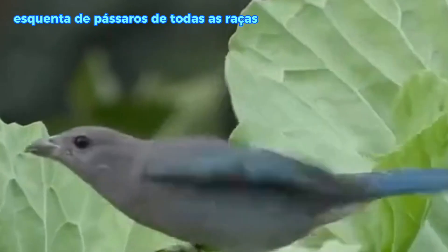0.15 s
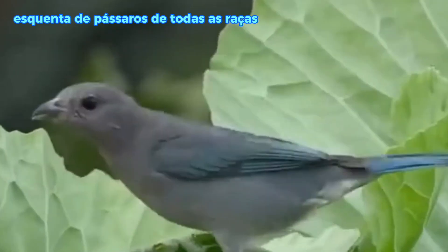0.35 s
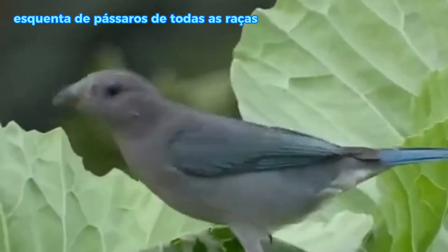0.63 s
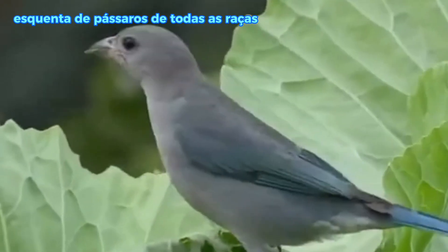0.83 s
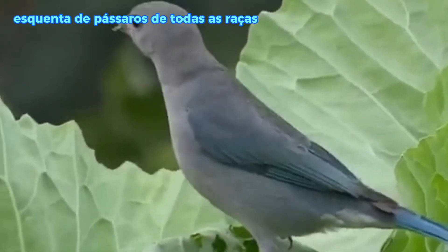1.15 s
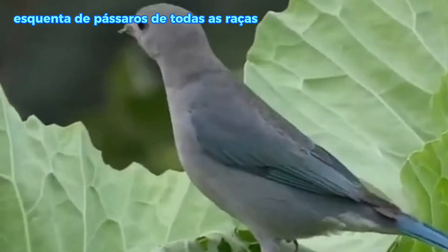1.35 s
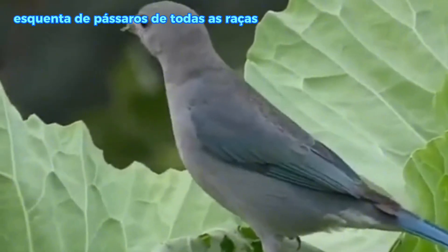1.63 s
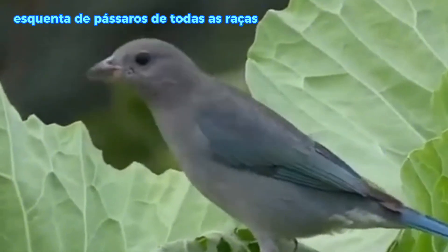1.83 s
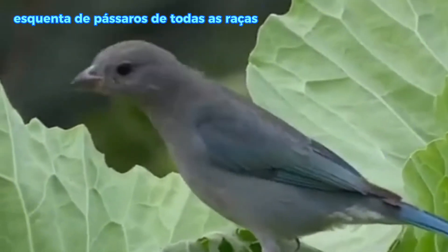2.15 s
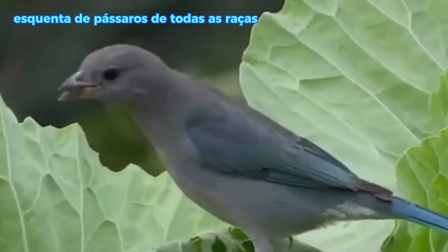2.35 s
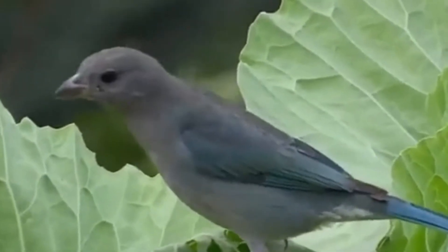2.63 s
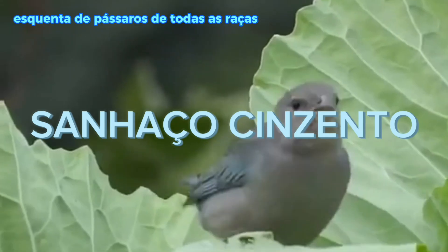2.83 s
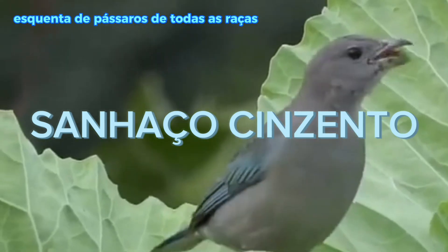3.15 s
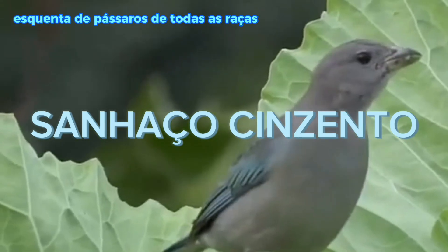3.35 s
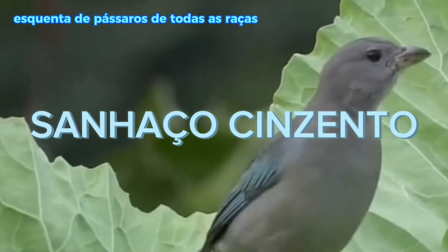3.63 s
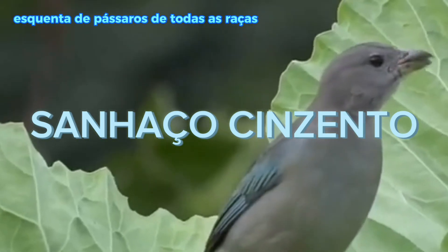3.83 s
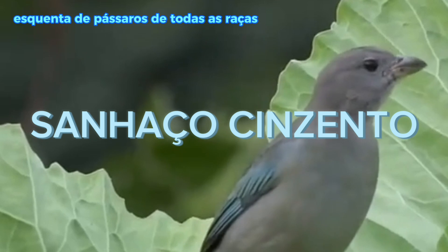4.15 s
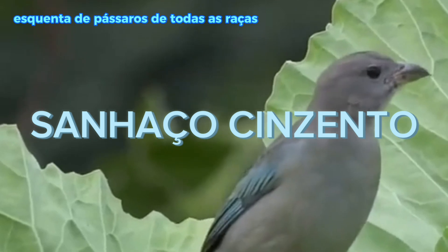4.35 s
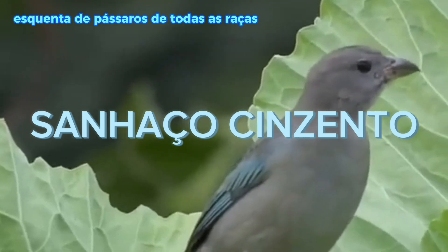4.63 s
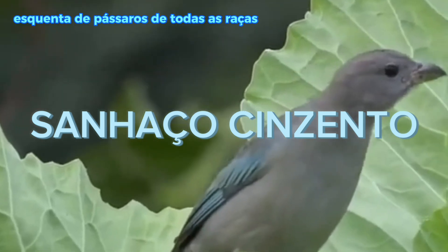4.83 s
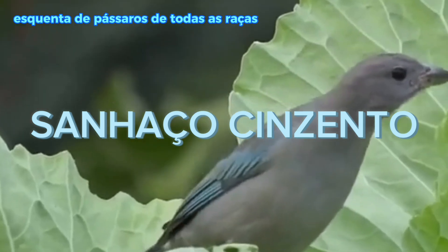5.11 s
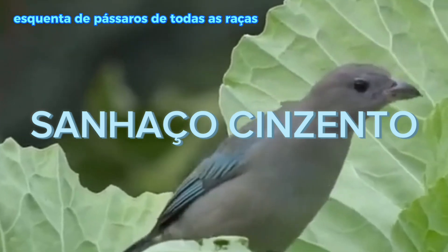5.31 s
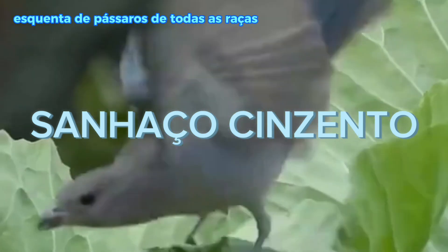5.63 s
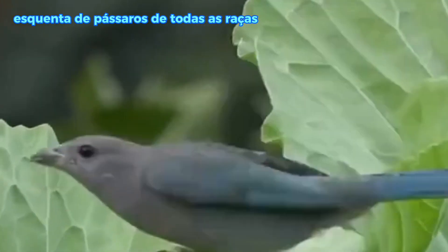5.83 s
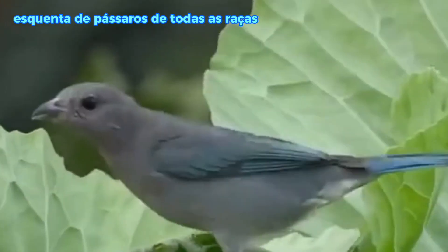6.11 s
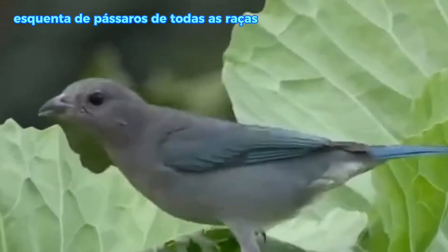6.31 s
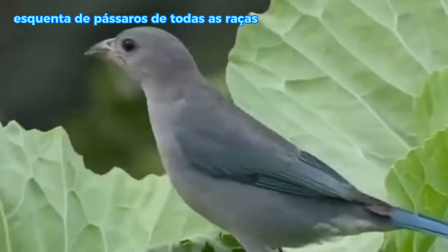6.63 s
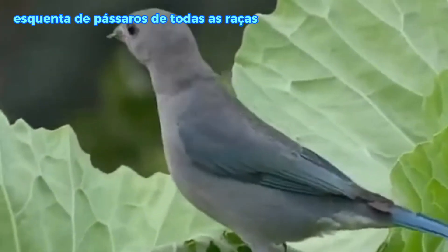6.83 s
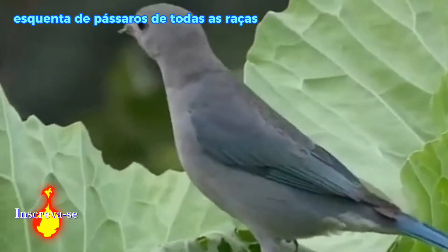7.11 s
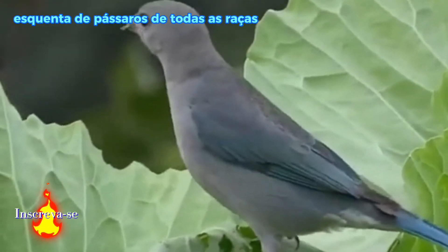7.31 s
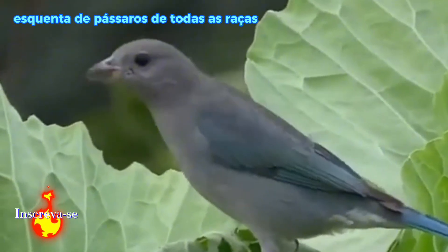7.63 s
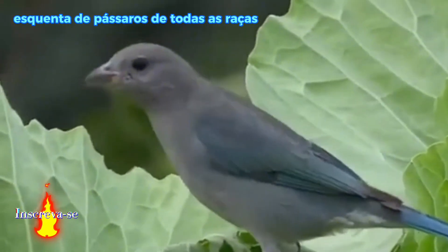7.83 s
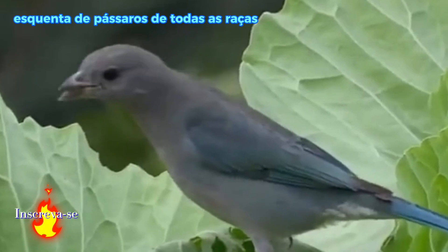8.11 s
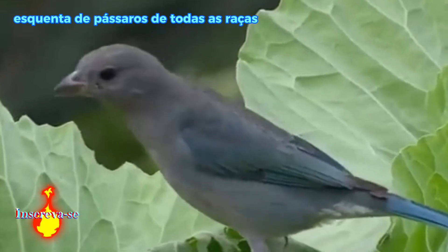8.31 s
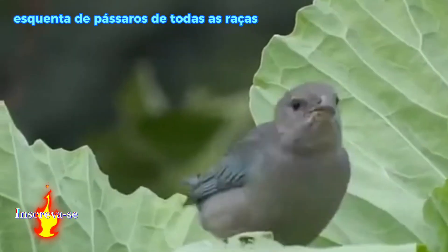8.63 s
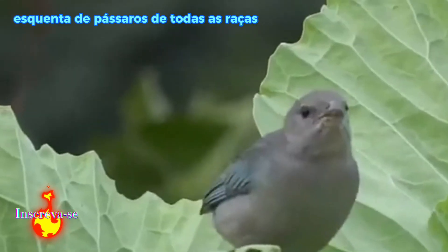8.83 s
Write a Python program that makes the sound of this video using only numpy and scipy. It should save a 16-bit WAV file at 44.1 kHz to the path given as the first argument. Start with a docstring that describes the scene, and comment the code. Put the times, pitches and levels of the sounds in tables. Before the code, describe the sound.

A sayaca tanager sings two squeaky, sliding phrases and a pure whistle between sharp falling chips, over low outdoor rumble and soft distant hoots.

```python
"""A tanager gives sharp falling chips, two phrases of squeaky song and a long whistle near a garden feeder.
Its notes are gliding tones with overtones and rasp from the two-sided voice box (syrinx).
Nearby walls, made of delayed copies and fading noise, throw the notes back so that they beat and smear.
Behind it: shaped noise for the rumble and hiss of outdoors, a faint hum that comes and goes,
soft distant hoots, and a few dull bumps and a light rustle at the microphone. Once the sound cuts out."""
import sys
import numpy as np
from scipy import signal
from scipy.fft import rfft, irfft, next_fast_len
from scipy.io import wavfile
from scipy.ndimage import uniform_filter1d, map_coordinates

SR = 44100
rng = np.random.default_rng(int(sys.argv[2]) if len(sys.argv) > 2 else 0)


def waveform_to_disk(signal):
    """Save audio, clipped to [-1, 1], as 16-bit WAV at the path in sys.argv[1]."""
    frames = np.transpose(np.atleast_2d(signal))
    scaled = np.clip(frames, -1, 1) * 32767
    samples = np.round(scaled).astype(np.int16)
    wavfile.write(sys.argv[1], SR, samples)


N = 395136
TIME = np.arange(N) / SR
TOP_HZ = 15850  # no sound is kept above this pitch


def amp(db):
    """Turn decibels into a plain multiplier."""
    return 10 ** (np.asarray(db) / 20)


def unit(x):
    """Scale a sound to an average (RMS) strength of 1."""
    return x / np.sqrt(np.mean(x ** 2) + 1e-20)


def along(points, hz):
    """Read a (frequency [Hz], value) table at hz, joining its points on a log frequency axis."""
    f, v = np.transpose(points)
    return np.interp(np.log(hz + 1), np.log(f + 1), v)


def curves(rows, t=TIME):
    """Read each column after the time column at times t."""
    s, *columns = np.transpose(rows)
    return [np.interp(t, s, column) for column in columns]


def wobble(rate, size):
    """A smooth random curve through `rate` random points a second."""
    knots = rng.standard_normal(int(size * rate / SR) + 4)
    return map_coordinates(knots, [np.arange(size) * rate / SR])


def filtered(x, response):
    """Scale every frequency of a sound by response(frequency)."""
    m = next_fast_len(len(x) + 8192)
    return irfft(rfft(x, m) * response(np.fft.rfftfreq(m, 1 / SR)), m)[:len(x)]


def add(track, s, sound):
    """Mix a sound into the track at time s."""
    start = max(round(s * SR), 0)
    part = track[start:start + len(sound)]
    part += sound[:len(part)]


# tone balance of the outdoor noise: (frequency [Hz], relative level [dB per Hz])
AIR = [(12, -43), (20, -22.5), (70, 3.5), (126, -5.5), (213, -15), (315, -14), (491, -17), (649, -17),
       (1130, -21), (1870, -26), (3640, -32.5), (5230, -37), (15500, -49)]
# background before and after the dropout, before small lifts: (time [s], rumble level [dB], wash level [dB])
BACKGROUND = [
    [(0.0, -43, -49), (0.7, -48, -49), (0.83, -52, -49), (1.01, -51, -50), (1.14, -47, -50),
     (1.48, -47, -49), (1.6, -46, -49), (1.92, -49, -51), (2.37, -47, -52), (2.46, -49, -52),
     (2.55, -53, -52)],
    [(2.95, -53, -51), (3.17, -48, -50), (3.84, -49, -51), (4.66, -54, -54), (5.14, -50, -49),
     (5.64, -52, -54), (6.18, -46, -48), (7.42, -49, -50), (7.92, -40, -51), (8.44, -47, -50),
     (8.96, -46, -50)],
]
# the thin hiss: (time [s], level [dB])
HISS = [(0, -59), (1.1, -62), (3.1, -61.5), (5.6, -67), (6.5, -63), (8.05, -62), (8.96, -65.5)]
# the hum, before a 1 dB lift: (time [s], level [dB])
HUM = [(0, -70), (1, -59), (1.3, -42), (1.7, -42), (2.2, -68), (8.3, -73.5), (8.6, -45), (8.96, -49.5)]


def outdoors(rumble_hz=220, hiss_hz=1800, hum_hz=124):
    """Noise split into distant rumble, middle wash and thin hiss, each with its own level, plus a wavering hum."""
    def below(hz, edge):
        return 1 / np.sqrt(1 + (hz / edge) ** 8)

    def above(hz, edge):
        return np.sqrt(1 - below(hz, edge) ** 2)

    def band(shape):
        noise = rng.standard_normal(N)
        return unit(filtered(noise, lambda hz: amp(along(AIR, hz)) * shape(hz)))

    rumble_db, wash_db = curves(np.concatenate(BACKGROUND))
    rumble_db = rumble_db + 4.2 + 0.54 * wobble(7.8, N)
    wash_db = wash_db + 0.3 + 0.479 * wobble(12, N)
    rumble = amp(rumble_db) * band(lambda hz: below(hz, rumble_hz))
    wash = amp(wash_db) * band(lambda hz: above(hz, rumble_hz) * below(hz, hiss_hz))
    hiss = amp(curves(HISS)[0]) * band(lambda hz: above(hz, hiss_hz))
    hum_phase = 2 * np.pi * np.cumsum(hum_hz + 1.2 * wobble(2, N)) / SR
    hum = amp(curves(HUM)[0] + 1) * np.sin(hum_phase)
    return rumble + wash + hiss + hum


# tone balance of the bird's rasp: (frequency [Hz], relative level [dB per Hz])
RASP = [(1200, -18.5), (1850, -8.5), (2500, -3), (4000, -1.5), (6000, 0.5), (8200, 1), (10500, -2.5),
        (15500, -17.5)]


def syrinx(hz, level_db, octave_db, rough, jitter=.06, flutter_db=7, rough_rate=420, third_db=-2, fall_db=-6,
           cap_db=-17, blur=1.0, rasp_db=-24, loose_hz=4200, fast_glide=11):
    """A gliding whistle with overtones; roughness shakes its pitch and strength and adds a rasp."""
    size = len(hz)
    # the membranes vibrate cleanly on high held notes, loosely on low notes and in fast glides
    glide = np.minimum(np.abs(np.gradient(np.log(hz))) * SR / fast_glide, 1) ** 2
    low_note = 1 / (1 + (hz / loose_hz) ** 12)
    loose = np.maximum(uniform_filter1d(glide, 400), low_note)
    rough = np.abs(rough) + .13 * glide
    hz = hz * (1 + jitter * rough * wobble(rough_rate, size))
    phase = 2 * np.pi * np.cumsum(hz) / SR

    def smear():
        return 2 * blur * np.sqrt(np.abs(rough)) * wobble(1300, size)

    octave_phase = 2 * phase + smear() * np.clip(hz / loose_hz - .8, 0, 1)
    tone = amp(level_db) * np.sin(phase)
    tone += amp(octave_db) * np.sin(octave_phase) * (2 * hz < TOP_HZ)
    # the higher overtones are weaker and lose their phase sooner
    loudest_db = np.maximum(level_db, octave_db)
    upper_db = np.minimum(octave_db + third_db, loudest_db + cap_db * (1 - rough))
    for k in range(3, 7):
        tone += amp(upper_db + fall_db * (k - 3)) * np.sin(k * phase + smear()) * (k * hz < TOP_HZ)
    # the rasp grows more slowly than the whistle
    noise = unit(filtered(rng.standard_normal(size), lambda f: amp(along(RASP, f))))
    rasp = 2 * amp(rasp_db + 0.4 * loudest_db) * (loose + 0.054) * np.abs(rough) ** 0.89 * noise
    edges = signal.windows.tukey(size, min(.007 * SR / size, 1))
    flutter = amp(flutter_db * rough * wobble(rough_rate, size))
    return (np.sqrt(2) * tone + rasp) * edges * flutter


# the octave is strongest where it meets the throat's resonance near 6 kHz:
# (pitch [Hz], octave over the basic tone [dB], before each note's own extra)
OCTAVE = [(2000, -4), (2400, -2), (2750, 5), (3050, 13), (3350, -3), (3700, -21), (5000, -18), (5800, -22),
          (6500, -38)]


def voice(hz, level_db, rough, extra_octave_db):
    """The syrinx heard through the throat, which favours the octave at some pitches."""
    return syrinx(hz, level_db, level_db + along(OCTAVE, hz) + extra_octave_db, rough)


# falling chips: (time [s], pitch the fall heads for [Hz], length [s], level [dB], overtone offset [dB],
# second voice offset [dB], treble boost [dB])
CHIPS = [ (0.381, 2500, .057, -43.5, -3, 1, 6), (1.188, 1950, .063, -40.5, -4.5, -1, 1),
         (1.422, 2300, .069, -38.5, -5.5, -12, 1.5), (2.937, 1900, .059, -38, -5, 2, -40),
         (3.242, 1780, .06, -39, 0, -2, 4), (3.398, 2260, .062, -38, 0.5, -7.5, 3),
         (6.163, 1850, .048, -35.5, 1, 0, 2.5), (7.994, 2500, .03, -63, -8, -8, -14),
         (8.735, 1900, .06, -41.2, -3.5, -1, 4), ]


def chips(start_hz=6200, lag=0.02, second_length=.026, onset_db=-8, lead_hz=7200, lead_db=-25, treble_hz=7000):
    """A thin high lead-in, then a plunge that swells and frays; the syrinx's other side follows a moment later."""
    glide_s, echo_db = .018, -3  # time constant of the plunge; strength of its wall echo
    lead_s = .022
    for s, end_hz, length, db, overtone_db, second_db, treble_db in CHIPS:
        t = np.arange(int(length * SR)) / SR
        hz = end_hz + (start_hz - end_hz) * np.exp(-t / glide_s)
        effort = db + np.interp(t / length, [0, .25, .7, 1], [onset_db, -3, 0, -5])
        octave = effort + overtone_db + np.interp(t / length, [0, .55, 1], [-10, 2, -6])
        rough = np.interp(t / length, [0, .6, 1], [.03, .32, .38])

        def colour(x):
            return filtered(x, lambda f: amp(treble_db / (1 + (treble_hz / (f + 1)) ** 30)))

        lead_in = syrinx(np.full(int(lead_s * SR), lead_hz), db + lead_db, db + lead_db - 12, .15)
        yield s - lead_s, lead_in, echo_db
        yield s, colour(syrinx(hz, effort, octave, rough)), echo_db
        early = t < second_length
        second = voice(hz[early], db + second_db, rough[early], -8)
        yield s + lag, colour(second), echo_db


# how long the later echoes take to fade by 60 dB: (frequency [Hz], fade time [s])
GARDEN = [(2000, 0.71), (5000, 0.43), (9000, 0.25), (15000, 0.25)]


def walls(x, early_t60=0.26, late_db=-5, first_s=0.0053):
    """Echoes made of fading noise: dense early reflections and a longer tail whose treble dies first."""
    hz, t, z = signal.stft(rng.standard_normal(SR // 2), SR, nperseg=256)
    early = amp(-60 * t / early_t60)
    late = amp(late_db - 60 * t / along(GARDEN, hz)[:, None])
    tail = signal.istft(z * (early + late), SR, nperseg=256)[1]
    # silent until first_s, then rising to full by twice that time
    tail *= np.clip(np.arange(len(tail)) / (first_s * SR) - 1, 0, 1)
    return signal.fftconvolve(x, tail / np.linalg.norm(tail))


# tone balance of the notes: (frequency [Hz], boost [dB])
NOTE_TONE = [(2000, 1), (7500, 0), (8500, 5), (9600, -5), (11300, 5), (13000, -4), (14700, 11), (15800, 1)]
# the nearest walls: (delay [s], level [dB])
REFLECTIONS = [(.021, -8), (.043, -27)]


def tanager(beam_hz=7500, diffuse_db=-1, shade_db=-1.5):
    """Notes arrive directly and off walls; a bird that faces away sends more, and its treble, to the walls."""
    track = np.zeros(N)
    for s, note, echo_db in [*syllables(), held_whistle(), *chips()]:
        note = filtered(note, lambda hz: amp(along(NOTE_TONE, hz)))
        away = amp(echo_db)
        treble = filtered(note, lambda hz: 1 / (1 + (beam_hz / (hz + 1)) ** 8))
        direct = note - np.minimum(away, .8) * treble
        direct = direct * amp(shade_db * np.minimum(away, 1) ** 3)
        # no tail outlasts the dropout
        heard = track[:int(DROPOUT[2][0] * SR)] if s < DROPOUT[0][0] else track
        add(heard, s, direct)
        add(heard, s, amp(diffuse_db) * walls(note * away))
        for delay, db in REFLECTIONS:
            add(heard, s + delay, amp(db) * note * away)
    return track


# two phrases in the same order, the second carried on to its ending:
# (time [s], syllable name, length [s], level [dB], wall echo [dB])
SONG = [ (1.540, "peep", .022, -36, -3), (1.559, "snap", .012, -42, -3), (1.594, "chirp", .038, -33.5, -3),
        (1.675, "sizzle", .03, -29, -3), (1.677, "dive", .025, -22, -3), (1.694, "swoop", .066, -25.5, -4),
        (1.730, "undertone", .027, -37.5, -5), (1.815, "upsweep", .062, -21.5, -3),
        (1.932, "hook", .029, -34.5, -3), (1.966, "slur", .050, -27, -3), (2.015, "snap", .014, -36, -1),
        (2.096, "arch", .300, -16.8, -4.5), (2.488, "twang", .062, -31.5, -3),
        (2.552, "flick", .028, -31, -2), (2.556, "sizzle", .02, -26, -2), (2.628, "rise", .200, -21, -3.5),
        (3.515, "peep", .020, -36, -4.5), (3.534, "snap", .014, -37, -4.5),
        (3.566, "chirp", .040, -31, -4.5), (3.652, "sizzle", .03, -26, -6),
        (3.655, "dive", .027, -18.5, -6), (3.675, "swoop", .060, -21, -6.5),
        (3.702, "undertone", .031, -34, -6), (3.797, "upsweep", .057, -19, -6),
        (3.906, "hook", .030, -34.5, -3), (3.939, "slur", .047, -26.5, -3), (3.985, "snap", .013, -30, -3),
        (4.066, "arch", .296, -13.2, -6.5), (4.452, "twang", .058, -30.5, -5),
        (4.511, "flick", .029, -31, -5), (4.597, "rise", .265, -14.5, -6), (4.964, "creak", .022, -43, -1),
        (4.986, "dip", .040, -29.5, -1), (5.026, "twang", .035, -30, -7), (5.060, "flick", .025, -28, -3),
        (5.141, "pip", .114, -14, -10), (5.168, "squeal", .148, -20.5, -3), (5.764, "creak", .021, -44, -7),
        (5.794, "droop", .186, -27.3, -7), ]
# each syllable's pitch at even steps from its start to its end: name: (pitch [Hz], ...)
PITCH_PATHS_HZ = { "peep": (3850, 4150, 4250), "snap": (4900, 3200, 2100),
                  "chirp": (3600, 2700, 2350, 1500), "sizzle": (7500, 7800, 7500),
                  "dive": (6900, 5750, 5050), "swoop": (7400, 5600, 4950, 4500, 4230),
                  "undertone": (3000, 2600, 2400), "upsweep": (4080, 4300, 4700, 5550, 6900),
                  "hook": (1980, 2200, 2450, 3050), "slur": (4500, 4170, 3800, 3580),
                  "arch": (5850, 6020, 6480, 6840, 6350, 5480, 3950), "twang": (2750, 2940, 3070, 3300),
                  "flick": (3500, 3850, 3500, 2450),
                  "rise": (4100, 4650, 4820, 5000, 5220, 5400, 5730, 6600), "creak": (2400, 2700),
                  "dip": (4050, 3750, 2600, 2480), "pip": (6130, 6220, 6220, 6050, 5750),
                  "squeal": (8550, 8350, 7700, 7050, 6500),
                  "droop": (3830, 3780, 3560, 3400, 3350, 3170, 2480), }
# how each syllable is blown:
# name: (attack [s], release [s], swell over the note [dB], extra octave [dB], roughness [0-1])
BLOWING = { "peep": (.015, .002, 0, 5, .2), "snap": (.002, .003, 0, -9, .6),
           "chirp": (.014, .004, -5, -6, .35), "sizzle": (.004, .008, 0, 4, .5),
           "dive": (.006, .006, 0, 5, .25), "swoop": (.008, .008, -13, 4, .17),
           "undertone": (.002, .005, -2, -14, .3), "upsweep": (.04, .008, 2, 5, .22),
           "hook": (.014, .004, 2, 1, .2), "slur": (.004, .006, -8, 2, .22),
           "arch": (.011, .045, -1.5, 0, .12), "twang": (.012, .003, 2, 3, .06),
           "flick": (.002, .009, -3, 5, .4), "rise": (.042, .02, -1, -3, .06),
           "creak": (.004, .004, 0, -3, .3), "dip": (.009, .005, -6, -3, .38),
           "pip": (.011, .075, 0, -6, .03), "squeal": (.012, .008, 8, 9, .4),
           "droop": (.024, .03, -3, 2, .08), }


def syllables():
    """Each syllable glides along its pitch path under an attack, a steady swell and a release."""
    edge_db = -16  # added at a syllable's very start and end
    waver_db, waver_per_s = 2.2, 70  # a random waver in level, like a note beating with its echoes
    for s, name, length, db, echo_db in SONG:
        attack, release, swell_db, octave_db, rough = BLOWING[name]
        path = PITCH_PATHS_HZ[name]
        t = np.arange(int(length * SR)) / SR
        corners = np.interp(t / length, np.linspace(0, 1, len(path)), path)
        hz = uniform_filter1d(corners, len(t) // (2 * len(path)), mode="nearest")
        edge = np.maximum(1 - t / attack, 0) + np.maximum(1 - (length - t) / release, 0)
        level_db = db + swell_db * (t / length - .5) + edge_db * edge
        level_db = level_db + waver_db * wobble(waver_per_s, len(t))
        yield s, voice(hz, level_db, rough, octave_db), echo_db


# distant calls: (time [s], length [s], middle pitch [Hz], glide [Hz], level before the mix [dB])
FAR_CALLS = [(4.76, .12, 765, 30, -58), (4.99, .12, 725, -30, -46.5), (5.19, .15, 668, 20, -51),
             (6.01, .10, 752, 10, -50), (6.22, .11, 778, 10, -50), (6.71, .10, 757, 20, -52),
             (6.95, .09, 718, 80, -49), (7.03, .11, 1075, 30, -57), (7.27, .11, 1118, -10, -54)]


def far_calls():
    """Soft hoots of a distant bird: wavering tones that swell and fade, blurred by echoes."""
    track = np.zeros(N)
    for s, length, hz, glide_hz, db in FAR_CALLS:
        u = np.linspace(0, 1, int(length * SR))
        pitch = (hz + glide_hz * (u - .5)) * (1 + .02 * wobble(70, len(u)))
        strength = amp(db + 3.4 * wobble(50, len(u))) * np.sin(np.pi * u)
        call = strength * np.sin(2 * np.pi * np.cumsum(pitch) / SR)
        add(track, s, 1.52 * call)
        add(track, s, 1.1 * walls(call))
    return track


# the long whistle after the second phrase: (time [s], pitch [Hz], level [dB])
HELD_WHISTLE = [(5.412, 5111, -38), (5.432, 5098, -21), (5.472, 4938, -17), (5.486, 4916, -10),
                (5.562, 4928, -12), (5.612, 4943, -17), (5.648, 4926, -47), (5.728, 4936, -41),
                (5.755, 4940, -53)]


def held_whistle(rough=.025, octave_db=-7, echo_db=-30):
    """One pure, almost dry note that sinks to a thin thread of tone."""
    start, end = HELD_WHISTLE[0][0], HELD_WHISTLE[-1][0]
    hz, level_db = curves(HELD_WHISTLE, np.arange(start, end, 1 / SR))
    return start, voice(hz, level_db, rough, octave_db), echo_db


# microphone bumps: (time of the middle [s], pitch [Hz], spread either side [s], strength [dB])
BUMPS = [(7.707, 62, 0.0095, -27.5), (7.772, 57.7, 0.014, -29.5), (7.854, 79.4, 0.0039, -20.5),
         (7.932, 61, 0.01, -19), (7.963, 96, 0.0056, -21), (8.334, 58.8, 0.016, -29.5)]
# one light rustle: (time [s], centre frequency [Hz], time to fade by 60 dB [s], level [dB])
RUSTLE = (7.928, 11000, .06, -45)


def handling():
    """Dull bumps on the microphone, as short bell-shaped bursts of low tone, and a rustle of fading noise."""
    track = np.zeros(N)
    for s, hz, spread, db in BUMPS:
        swell = np.exp(-((TIME - s) / spread) ** 2 / 2)
        track -= amp(db) * swell * np.sin(2 * np.pi * hz * (TIME - s))
    t = np.arange(SR // 4) / SR
    s, centre_hz, t60, db = RUSTLE
    noise = rng.standard_normal(len(t))
    noise = unit(filtered(noise, lambda hz: np.exp(-(np.log((hz + 1) / centre_hz) / .5) ** 2)))
    add(track, s, noise * amp(db - 60 * t / t60))
    return track


def scene():
    """All the layers together, as one channel."""
    return (tanager() + outdoors() + far_calls() + handling())[None]


# the sound cuts out briefly: (time [s], level [dB])
DROPOUT = [(2.709, 0), (2.713, -35), (2.735, -70), (2.765, -70), (2.787, 0)]


def record(dry):
    """The sound drops out for a moment; nothing passes above the band limit."""
    level = amp(curves(DROPOUT)[0])
    return filtered(dry[0] * level, lambda hz: hz < TOP_HZ)[None]


dry = scene()
out = record(dry)
waveform_to_disk(out)
```